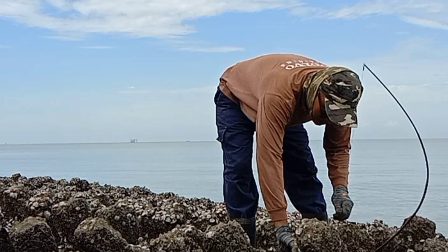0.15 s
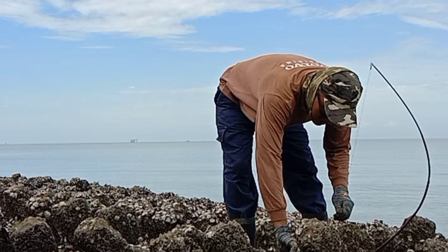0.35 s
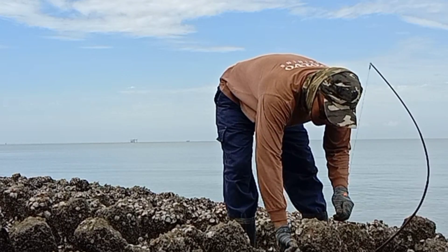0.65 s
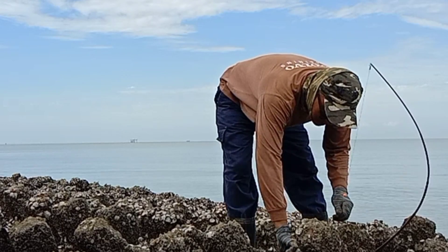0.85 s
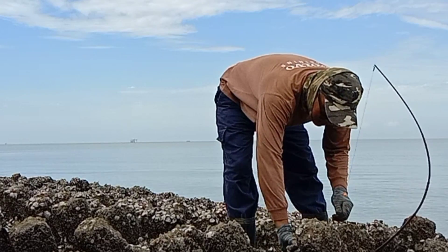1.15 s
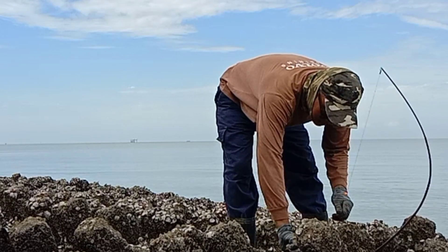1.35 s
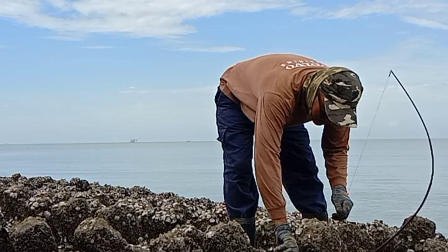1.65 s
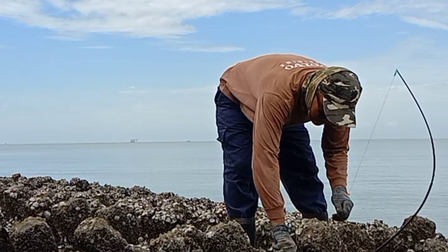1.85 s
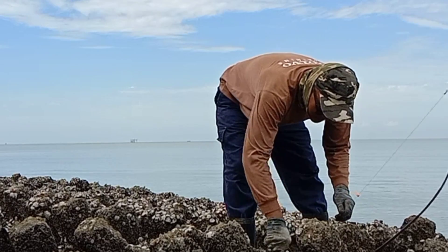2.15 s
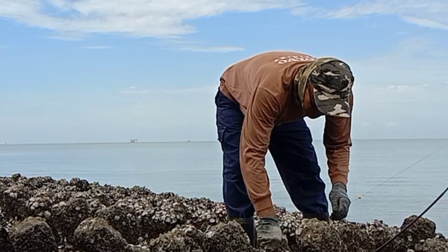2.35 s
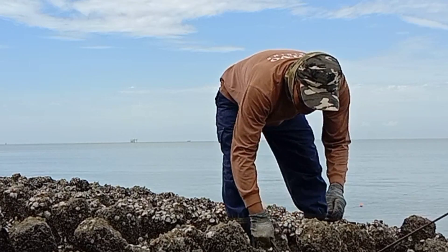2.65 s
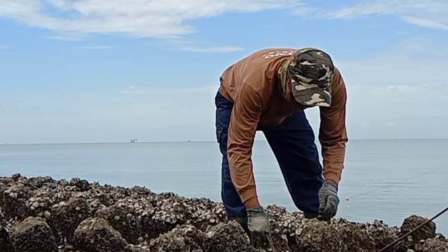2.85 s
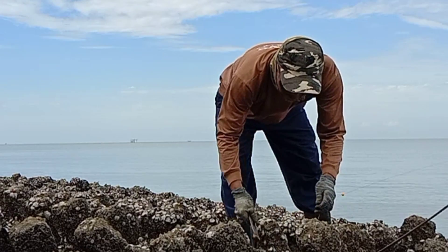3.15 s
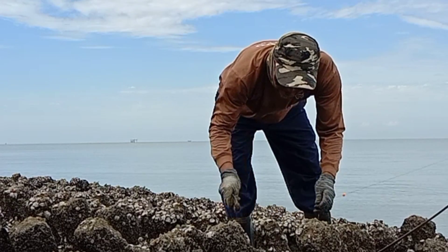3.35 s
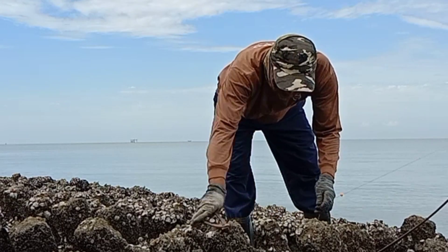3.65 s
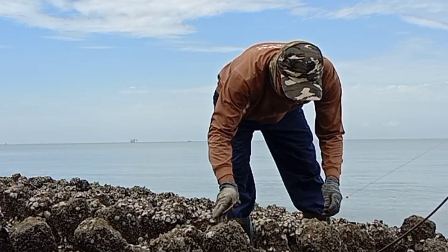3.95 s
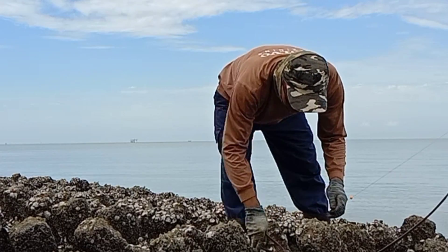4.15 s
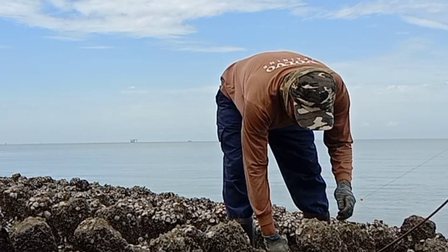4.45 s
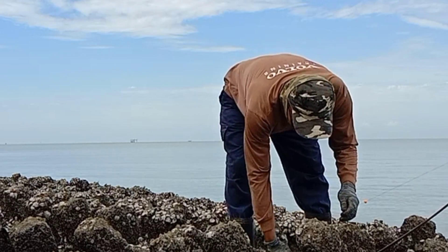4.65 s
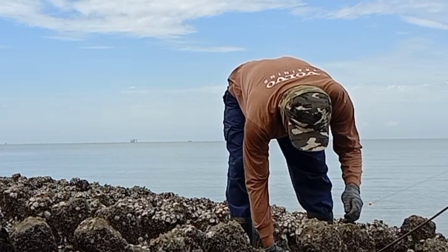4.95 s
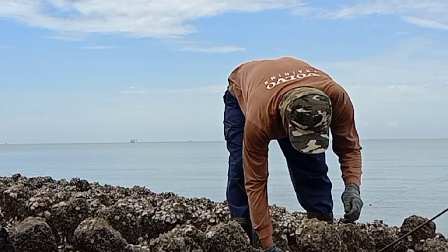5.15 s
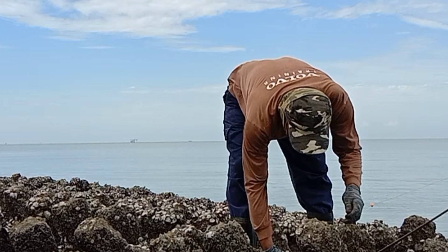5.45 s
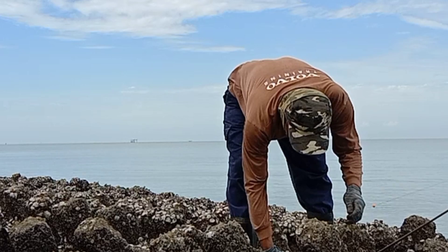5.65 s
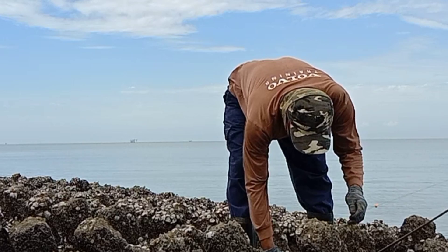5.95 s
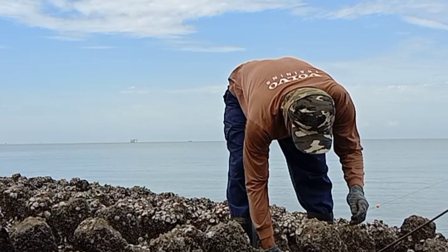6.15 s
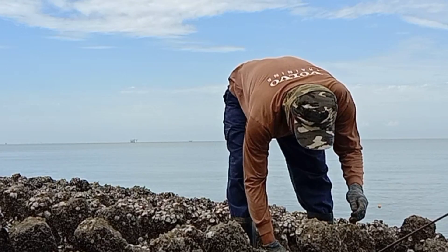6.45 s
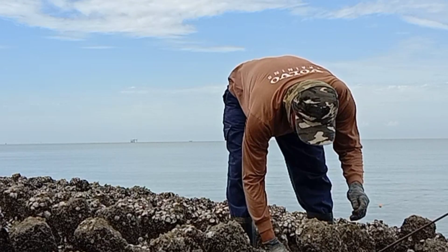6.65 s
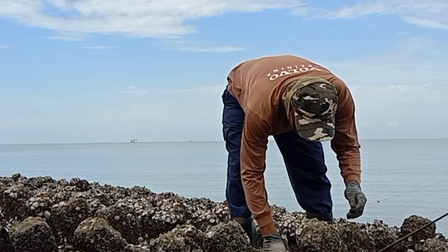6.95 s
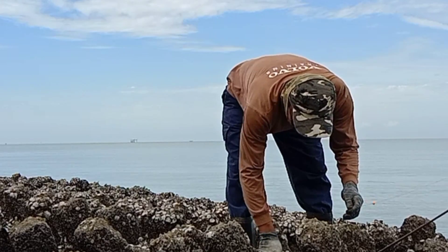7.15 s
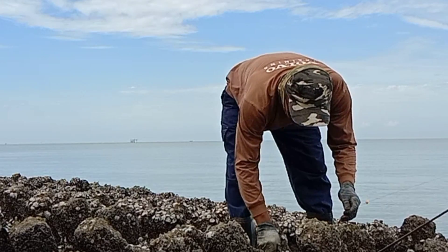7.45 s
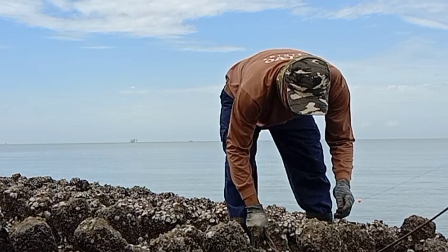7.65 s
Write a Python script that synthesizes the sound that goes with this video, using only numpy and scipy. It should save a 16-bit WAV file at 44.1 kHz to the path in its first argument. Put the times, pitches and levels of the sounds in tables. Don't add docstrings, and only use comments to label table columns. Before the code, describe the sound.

Shell clinks, scrapes and snaps at a quiet rocky shore, with two sharp metallic strikes, soft wind thumps, lapping water and distant bird calls.

```python
import sys
import numpy as np
from scipy import signal
from scipy.fft import rfft, irfft, next_fast_len
from scipy.io import wavfile
from scipy.ndimage import uniform_filter1d, map_coordinates

SR = 44100
rng = np.random.default_rng(int(sys.argv[2]) if len(sys.argv) > 2 else 0)


def volts_from_decibels(level):
    exponent = np.asarray(level, float) / 20
    return 10 ** exponent


def store_pcm(level_fs):
    pcm = np.round(np.clip(level_fs, -1, 1) * 32767).astype(np.int16)
    wavfile.write(sys.argv[1], SR, np.atleast_2d(pcm).T)


N = 344421


def unit(x):
    return x / np.sqrt(np.mean(x ** 2) + 1e-20)


def curves(rows, t):
    s, *columns = np.transpose(rows)
    return [np.interp(t, s, column) for column in columns]


def wobble(rate, size=N):
    knots = rng.standard_normal(int(size * rate / SR) + 4)
    return map_coordinates(knots, [np.arange(size) * rate / SR])


def white_noise(t):
    return rng.standard_normal(len(t))


def coloured(x, spectrum):
    m = next_fast_len(len(x) + 4096)
    f, db = np.transpose(spectrum)
    gain = volts_from_decibels(np.interp(np.log(np.fft.rfftfreq(m, 1 / SR) + 1), np.log(f + 1), db))
    return unit(irfft(rfft(x, m) * gain, m)[:len(x)])


def rush(spectrum, patchy_db):
    z = signal.stft(rng.standard_normal(N + 512), nperseg=512)[2]
    field = uniform_filter1d(rng.standard_normal(z.shape), 5, 0)
    field = uniform_filter1d(field, 9, 1)
    patchy = signal.istft(z * volts_from_decibels(patchy_db * unit(field)), nperseg=512)[1]
    return coloured(patchy[:N], spectrum)


def add(track, s, sound):
    spot = track[round(s * SR):][:len(sound)]
    spot += sound[:len(spot)]


def dying(t, t60, attack):
    return volts_from_decibels(-60 * t / t60) * (1 - np.exp(-t / attack))


def ringing(hz, db, t60, t, attack):
    phase = 2 * np.pi * rng.random((len(hz), 1))
    tones = np.sin(2 * np.pi * hz[:, None] * t + phase)
    return np.sum(volts_from_decibels(db)[:, None] * dying(t, t60[:, None], attack) * tones, axis=0)


def chirps(events, rise):
    out = np.zeros(N)
    for s, db, hz, length in events:
        size = max(length, .008) * SR
        u = np.arange(round(size)) / size
        pitch = hz * (1 + rise * (np.sqrt(u) - .7))
        swell = np.sin(np.pi * u ** 0.69)
        add(out, s - .004, volts_from_decibels(db) * swell * np.sin(2 * np.pi * np.cumsum(pitch) / SR))
    return out


def echoes(x, t60, wet_db, lumpy_db):
    t = np.arange(SR // 3) / SR
    tail = white_noise(t) * dying(t, t60, 1 / 120) * volts_from_decibels(lumpy_db * wobble(150, size=len(t)))
    return x + volts_from_decibels(wet_db) * signal.fftconvolve(x, tail / np.linalg.norm(tail))[:N]


# (frequency [Hz], level [dB])
HUM_TONE = [(90, -27.5), (120, -3), (148, 3.5), (190, -12.5), (300, -22.5), (500, -45.5)]


def far_hum():
    return volts_from_decibels(-72.0 + 2.5 * wobble(7.1)) * rush(HUM_TONE, patchy_db=1.5)


# (time [s], peak level [dB])
WIND_THUMPS = [(0.009, -50), (0.25, -64), (0.41, -54), (0.627, -60), (1.277, -51.5), (1.537, -49.5),
               (1.764, -58.5), (1.925, -53), (2.487, -51), (2.657, -59), (2.798, -52), (3.015, -48),
               (3.178, -53), (3.342, -51.5), (3.425, -47.5), (3.606, -44), (4.741, -53.5), (5.496, -47.5),
               (5.583, -49), (5.951, -50.5), (6.015, -51), (6.317, -48), (6.441, -50.5), (6.995, -50.5),
               (7.086, -51), (7.154, -50.5), (7.378, -56.5), (7.577, -55), (7.679, -53), (7.755, -52)]
# (frequency [Hz], level [dB])
THUMP_TONE = [(12, -60), (20, -24), (27, -29), (47, -20.5), (64, -3), (120, -3.5), (160, -40), (260, -120)]


def wind_thumps():
    puffs = [(s, db, 66 + 4 * rng.standard_normal(), 0.087) for s, db in WIND_THUMPS]
    rumble = volts_from_decibels(-69 + 9.9 * np.tanh(wobble(12))) * rush(THUMP_TONE, patchy_db=1.74)
    return chirps(puffs, rise=0.011) + rumble


# (time of peak [s], peak level [dB], half length [s])
GUSTS = [
    (2.573, -91, 0.045),
    (2.822, -68, 0.015),
    (5.527, -57, 0.029),
    (5.985, -50.5, 0.031),
    (6.069, -58, 0.028),
    (6.446, -50.5, 0.052),
    (6.983, -71, 0.33),
    (7.158, -46, 0.11),
    (7.633, -54.5, 0.16),
]
# (frequency [Hz], level [dB])
BUFFET_TONE = [(76, -35.5), (130, -10.5), (242, 2), (318, -12.5), (450, -37.5), (580, -70), (990, -120)]


def wind_buffets():
    t = np.arange(N) / SR
    breeze = volts_from_decibels(np.interp(t, [5.73, 5.95], [-85, -76.5]))
    gusts = sum(volts_from_decibels(db - 14 * np.abs(t - s) / half) for s, db, half in GUSTS)
    return (breeze + gusts) * rush(BUFFET_TONE, patchy_db=3.5)


# (time [s], level [dB])
WASH = [(0, -74), (2.6, -76.5), (3.3, -70.5), (4.1, -74.5), (4.55, -66.5), (5.2, -67), (5.45, -75.5),
        (6.4, -71), (6.9, -69.5), (7.0, -67.5), (7.3, -67.5), (7.45, -66.5), (7.81, -58)]
# (frequency [Hz], level [dB])
LAPPING_TONE = [(150, -43), (250, -13), (393, -11), (605, -7), (1300, -5.5), (1420, -3.5), (1780, -12.5),
                (3500, -22.5), (4550, -50.5), (7700, -120)]
# (frequency [Hz], level [dB])
HISS_TONE = [(1500, -38.5), (2500, -16.5), (3300, -6), (4100, -19.5), (5300, -3), (6400, -9.5),
             (7350, -11.5), (7600, 2), (8200, -0.5), (9100, -9), (10400, -4), (11000, -17.5), (14900, -14),
             (15700, -21)]


def washing_water():
    wash_db, = curves(WASH, np.arange(N) / SR)
    lapping = volts_from_decibels(wash_db - 4.0) * rush(LAPPING_TONE, patchy_db=4)
    fine_hiss = unit(volts_from_decibels(1.6 * wobble(40)) * rush(HISS_TONE, patchy_db=2.2))
    return lapping + volts_from_decibels(-73.5 + 0.42 * (wash_db + 71)) * fine_hiss


def debris():
    place, pitch, size, life = rng.random((4, 1200))
    s = place * N / SR
    busy_db, = curves(WASH, s)
    db = -84 + .7 * (busy_db + 70) - 3 * np.log(size + .02)
    crumbs = chirps(np.transpose([s, db, 600 * 17 ** pitch, .008 + .014 * life]), rise=.05)
    return echoes(crumbs, t60=.1, wet_db=1.5, lumpy_db=3)


# (time [s], peak level [dB], pitch [Hz])
PLOPS = [(0.527, -64, 1366), (0.765, -61, 733), (0.871, -66.5, 1015), (1.238, -70.5, 1204),
         (2.12, -67.5, 1687), (2.409, -59, 1363), (2.564, -56.5, 474), (2.785, -48.5, 1250),
         (3.294, -63.5, 720), (3.33, -60.5, 702), (4.056, -67, 1416), (4.27, -67.5, 575),
         (4.377, -65.5, 694), (4.509, -48, 1118), (4.547, -56, 1120), (4.793, -59, 1486),
         (4.855, -50, 1440), (4.989, -61, 1103), (5.156, -58, 1198), (5.223, -58.5, 1165),
         (5.605, -64, 520), (5.78, -68.5, 535), (6.799, -66, 1674), (6.969, -52.5, 1310)]


def water_plops():
    plops = [(s, db, hz, 0.0068 * 0.15 * max(-45.5 - db, 0)) for s, db, hz in PLOPS]
    return echoes(chirps(plops, rise=.08), t60=.2, wet_db=-1.5, lumpy_db=3)


# (time [s], peak level [dB], pitch [Hz])
COO_NOTES = [(3.057, -41, 1244), (3.1923, -44.5, 1275), (3.261, -47.5, 1204), (3.3422, -50, 1252),
             (3.429, -47, 1256), (3.5491, -38.5, 1282), (5.965, -40, 1274), (6.1635, -44.5, 1230),
             (6.2348, -43.5, 1234), (6.318, -43, 1262), (6.429, -43, 1278)]
CALL_STARTS = [3.053, 5.962]
# (time [s], peak level [dB], pitch [Hz])
COO_THROBS = [(0.091, -63, 1264), (0.287, -64, 1257), (0.314, -62, 1244), (3.102, -42, 1317),
              (3.131, -52, 1444), (3.1409, -41.5, 1282), (3.164, -54, 1002), (3.177, -49.5, 1177),
              (3.579, -54, 1245), (3.6347, -64, 1163), (6, -42, 1353), (6.0371, -41.5, 1321),
              (6.0779, -41, 1240), (6.1, -45, 1305), (6.4539, -51, 1288), (6.501, -67, 1220),
              (6.636, -58.5, 1189)]


def dove():
    low = []
    for s, db, hz in COO_NOTES:
        since_start = min(s - start for start in CALL_STARTS if s > start - .01)
        low_db = -44 - 14 * (1 - np.exp(-since_start / 0.22))
        low.append((s - .011, low_db, 998, 0.024))
    notes = chirps([(*note, 0.03) for note in COO_NOTES], rise=0.18)
    throbs = chirps([(*throb, .03) for throb in COO_THROBS], rise=0.0068)
    return echoes(notes + throbs + chirps(low, rise=0.05), t60=0.3, wet_db=-6, lumpy_db=6)


def whistle(length, first_hz, last_hz, db, trill_hz, clean_s, flare_db, step_hz, swell_share):
    t = np.arange(0, length, 1 / SR)
    u = t / length
    clean = np.clip((t - length + clean_s) / 0.031, 0, 1)
    depth = .6 + (.1 - .6) * clean
    trill_rate = np.interp(u, [0, 1], trill_hz) * np.exp(.25 * wobble(30, size=len(t)))
    turn = 2 * np.pi * np.cumsum(trill_rate) / SR
    pulses = (1 + depth * np.cos(turn)) / np.sqrt(1 + depth ** 2 / 2)
    pitch = first_hz + (last_hz - first_hz) * u ** .65 - step_hz * clean + 85 * depth * np.sin(turn)
    tone = np.sin(2 * np.pi * np.cumsum(pitch) / SR)
    level_db = db - 22 * np.exp(-3 * u / swell_share) + flare_db * clean + 2.4 * wobble(40, size=len(t))
    edges = np.clip(np.minimum(t, length - t) / 0.017, 0, 1)
    return np.sqrt(2) * volts_from_decibels(level_db) * pulses * edges * tone


# (start [s], length [s], first pitch [Hz], last pitch [Hz], level [dB])
FALLING_WHISTLES = [
    (3.04, .33, 2850, 2530, -80),
    (3.4, .43, 5790, 4990, -61),
    (4.58, .515, 5260, 4660, -62.5),
    (5.92, .545, 5380, 5060, -55),
]
# (end [s], pitch [Hz], level [dB], clear ending [s], ending above the trill [dB])
LEVEL_WHISTLES = [
    (4.39, 4560, -65, .08, -5),
    (5.755, 4200, -71, .17, 7),
    (7.31, 3730, -68, .07, 6),
    (7.97, 3420, -65, .07, 0),
]


def bird_of_prey():
    out = np.zeros(N)
    for s, *call in FALLING_WHISTLES:
        add(out, s, whistle(*call, trill_hz=(95, 60), clean_s=.115, flare_db=7, step_hz=80, swell_share=.6))
    length = .4
    for end, hz, db, clean_s, flare_db in LEVEL_WHISTLES:
        call = whistle(length, hz, hz * (1 - .008), db, (50, 40), clean_s, flare_db, step_hz=30, swell_share=.3)
        add(out, end - length, call)
    return echoes(out, t60=.16, wet_db=-3, lumpy_db=4)


# (start [s], length [s], level [dB])
RUMMAGING = [
    (2.64, .1, -73.5),
    (2.883, .42, -78),
    (4.152, .4, -86),
    (4.697, 0.79, -81),
    (6.933, 0.13, -66),
    (7.166, 0.11, -67),
    (7.328, 0.29, -72),
]


def rummage():
    out, t = np.zeros(N), np.arange(SR // 40) / SR
    for s, length, level_db in RUMMAGING:
        when, size = rng.random((2, 400))
        draw = rng.standard_normal((400, 7))
        clump_db = 3 * wobble(13.1, size=SR)
        for k, (pitch, life, *partials) in enumerate(draw[:round(length * 410)]):
            hz = np.clip(6580 * 2 ** (0.54 * pitch + 0.4 * np.array(partials)), 900, 15000)
            after = when[k] * length
            db = level_db - 2 * np.log(size[k] + 0.02) + clump_db[round(after * SR)]
            t60 = 0.017 * np.exp(.4 * life)
            add(out, s + after, ringing(hz, np.full(len(hz), db), np.full(len(hz), t60), t, .002))
    return out


# (time [s], peak level [dB], brightest pitch [Hz], knock [dB])
CLINKS = [(1.877, -38.5, 8400, -16), (1.9827, -36, 5860, -22), (2.2012, -42, 5470, -28),
          (2.5578, -51.5, 3210, -8), (2.9712, -34.5, 5920, -23), (3.881, -51.5, 965, -12),
          (4.4663, -48, 5230, -12), (5.3795, -49, 6400, -14.5), (6.4593, -47.5, 5280, -2),
          (6.7376, -54, 5040, -3.5), (7.336, -47.5, 8860, -40), (7.4384, -46, 3080, -30),
          (7.4555, -48, 4970, -20), (7.564, -34.5, 8900, -30), (7.576, -31, 6290, -13)]
# (time [s], peak level [dB], brightest pitch [Hz], knock [dB])
SCRAPES = [(2.7108, -35.5, 7380, -41), (7.1664, -28.5, 6480, -25), (7.2459, -48, 3600, -16),
           (7.3536, -44, 5690, -28), (7.39, -46, 7900, -29), (7.501, -40, 6300, -18),
           (7.5986, -41.5, 5170, 6.5), (7.675, -45, 8450, 1), (7.7061, -55, 3470, 4)]
# (time [s], peak level [dB], brightest pitch [Hz], time to fall 60 dB [s], knock [dB])
HOLLOW_SHELLS = [
    (1.93, -40, 3300, 0.5, -25),
    (2.8135, -35, 3070, 0.08, -8),
]
# (time [s], peak level [dB], brightest pitch [Hz])
TICKS = [(0.8674, -49, 2430), (1.5195, -52.5, 7530), (1.7898, -50, 10100), (2.133, -49, 8560),
         (2.2352, -46.5, 13900), (2.641, -53, 5730), (2.668, -44.5, 7150), (2.9546, -55, 5200),
         (3.26, -48, 5600), (3.4775, -43, 7330), (4.43, -53.5, 6000), (5.2948, -47.5, 8500),
         (5.4363, -47.5, 10600), (5.7548, -42.5, 8740), (6.2432, -44.5, 5820), (6.7903, -44.5, 7000),
         (6.8303, -45, 6670), (7.19, -46, 6150), (7.2183, -44.5, 8700), (7.5294, -58, 6300),
         (7.7648, -67, 7900),
         (0.3157, -51, 7760), (0.4389, -56, 5200), (0.6644, -51.5, 8060), (0.7746, -54, 7930),
             (1.0294, -61, 8100), (1.053, -52, 7960), (1.2094, -54, 7880), (1.4057, -54, 8000),
             (1.5044, -51, 8080), (1.539, -56, 5100), (1.653, -51, 8000), (1.7194, -60, 7980)]
# (frequency [Hz], level [dB])
ROCK_TONE = [(120, -49.5), (200, -29), (409, -15.5), (1100, -11), (2910, -17.5), (3490, -6), (3970, -17),
             (5840, -2.5), (6880, -11.5), (7970, -4.5), (10100, -15.5), (14900, -14.5), (16000, -22.5)]


def touches():
    drag = lambda db: 2.0 + 0.079 * max(-37.5 - db, 0)
    return ([(*row, -22, 0.047 * drag(row[1])) for row in CLINKS]
            + [(*row, -1.5, 0.031 * drag(row[1])) for row in SCRAPES]
            + [(s, db, hz, knock_db, -30, t60) for s, db, hz, t60, knock_db in HOLLOW_SHELLS]
            + [(*row, -30, -12, 0.072) for row in TICKS])


def light_touches():
    out, t = np.zeros(N + SR), np.arange(SR // 5) / SR
    clumps = volts_from_decibels(3 * wobble(170))
    fizz_tone = [(9000, -81), (11500, 0.5), (12300, 9.0), (13000, -4), (15500, -16.5)]
    knock_tone = [(190, -33), (320, 4.5), (620, -24.5), (1250, 2.5), (2200, -10.0), (3500, -29.5)]
    for s, db, hz, knock_db, fizz_db, t60 in touches():
        slope_db = np.interp(db, [-44, -20], [34, 13])
        band = [(hz / 4, -2 * slope_db), (hz / 0.98, 0), (hz * 0.81, 0), (hz * 4, -2 * slope_db)]
        grit = coloured(coloured(white_noise(t), ROCK_TONE), band)
        fizz = volts_from_decibels(fizz_db) * coloured(white_noise(t), fizz_tone)
        knock = volts_from_decibels(knock_db) * coloured(white_noise(t), knock_tone)
        draw = rng.standard_normal((3, 5))
        shell_t60 = .35 * t60 * np.exp(.2 * draw[2])
        shell = ringing(hz * np.exp(.1 * draw[0]), 3 * draw[1], shell_t60, t, .0008)
        hit = dying(t, 0.24 * t60, 0.0032)
        trail = 0.099 * dying(t, 1.6 * t60, 0.0038) * np.roll(clumps, -round(s * SR))[:len(t)]
        add(out, s - .0006, volts_from_decibels(db - 5) * ((grit + fizz + knock) * (hit + trail) + 0.27 * shell))
    return out[:N]


# (start [s], peak time [s], end [s], level [dB], dull part [dB])
GRINDS = [(1.903, 1.918, 1.921, -52, -6), (2.777, 2.784, 2.825, -68, 6), (2.785, 2.812, 2.815, -60, -8),
          (2.8115, 2.816, 2.845, -42, -8), (2.822, 2.828, 2.85, -47, -10), (2.836, 2.842, 2.865, -46, -15),
          (2.848, 2.854, 2.875, -45, -18), (2.86, 2.868, 2.905, -48, -20), (3.87, 3.892, 3.895, -45, -8),
          (6.9, 6.923, 6.926, -55, -8), (7.16, 7.172, 7.23, -50, -10), (7.385, 7.4, 7.43, -57, -10),
          (7.43, 7.46, 7.51, -54, -4), (7.497, 7.51, 7.56, -52, -10), (7.572, 7.585, 7.66, -52, -4),
          (7.67, 7.685, 7.76, -56, -6)]
# (frequency [Hz], level [dB])
CRUNCH_TONE = [(1500, -38), (2600, -9.5), (3300, -11), (4100, -14.5), (5500, -1), (8300, -6.5),
               (10000, -16), (12500, -10), (15600, -7.5), (16500, -30)]
# (frequency [Hz], level [dB])
DULL_TONE = [(200, -27), (330, -3.5), (560, -3.5), (800, -14.5), (1290, 1.5), (2500, -9.5), (4000, -41)]


def grinds():
    out, t = np.zeros(N), np.arange(N) / SR
    bright = unit(volts_from_decibels(3 * wobble(700)) * rush(CRUNCH_TONE, patchy_db=4))
    dull = rush(DULL_TONE, patchy_db=3)
    for start, peak, end, db, dull_db in GRINDS:
        shape_db = np.interp(t, [start - .02, start, peak, end, end + .02], [-80, -17, 0, -17, -80])
        out += volts_from_decibels(db + shape_db) * (bright + volts_from_decibels(dull_db) * dull)
    return out


# (time [s], peak level [dB], brightest pitch [Hz])
SNAPS = [(2.8148, -18.5, 7630), (2.8203, -28, 7400), (2.8247, -24, 14500), (2.8285, -36.5, 6360),
         (2.8368, -50, 5590), (3.7478, -7, 7850), (3.758, -14.5, 5590), (3.7872, -28, 5600),
         (3.7956, -25.5, 5700), (3.8071, -26.5, 8080), (3.8259, -29.5, 5500), (3.8943, -1.5, 7400),
         (3.9008, -16.5, 7896), (3.9091, -19, 5330), (3.9188, -26, 5590), (3.9257, -27.5, 5680),
         (3.9377, -28, 5760), (6.9181, -49, 6970), (6.9579, -40.5, 5970), (7.3938, -44.5, 9600),
         (7.4562, -44, 4950), (7.5775, -45, 6300)]


def snaps():
    out, t = np.zeros(N), np.arange(SR // 50) / SR
    for s, db, hz in SNAPS:
        crack = dying(t, 0.0017, .0001) * coloured(white_noise(t), CRUNCH_TONE)
        ring = volts_from_decibels(1.5) * dying(t, 0.0047, 0.00025) * np.sin(2 * np.pi * hz * t)
        add(out, s - .0002, volts_from_decibels(db) * (crack / np.abs(crack).max() + ring) / 1.5)
    return out


# (pitch [Hz], level [dB], time to fall 60 dB [s])
WIDE_SHELL = [(1351, -4, .045), (1650, -9, .02), (2300, -12, .02), (3140, -2, .025), (3375, -9, .06),
              (3650, -5, .02), (5340, 0, .035), (5475, -5, .05), (5895, -2, .035), (6056, -8, .06),
              (6379, -4, .03), (7200, -9, .02), (7900, -12, .025), (9351, -10, .025)]
# (pitch [Hz], level [dB], time to fall 60 dB [s])
THIN_SHELL = [(1230, -3.5, 0.025), (1890, -18.5, .03), (3157, 0, 0.016), (3600, -9, 0.044),
              (5330, 3, 0.017), (5420, -6, 0.019), (5700, -18, 0.22), (5835, -2, 0.035), (7030, -1, 0.018),
              (8480, -8, 0.023)]
# (time [s], peak level [dB])
WIDE_TAPS = [
    (1.9188, -22.5),
    (1.9234, -27),
    (1.9272, -32),
]
# (time [s], peak level [dB])
THIN_TAPS = [
    (6.9239, -19),
    (6.9272, -24),
]
# (frequency [Hz], level [dB])
SHELL_CRACK_TONE = [(200, -33), (409, -14), (1200, -9), (2300, -14), (3300, -8), (4100, -16), (5800, -3),
                    (7200, -8), (8600, -8), (9800, -22), (15000, -24), (16000, -32)]


def shell_taps():
    out, t = np.zeros(N), np.arange(SR // 5) / SR
    for shell, hits in [(WIDE_SHELL, WIDE_TAPS), (THIN_SHELL, THIN_TAPS)]:
        for s, db in hits:
            crack = volts_from_decibels(5) * dying(t, .02, 0.00039) * coloured(white_noise(t), SHELL_CRACK_TONE)
            add(out, s, volts_from_decibels(db - 11.5) * (ringing(*np.transpose(shell), t, 0.00013) + crack))
    return echoes(out, t60=.16, wet_db=-15, lumpy_db=4)


# (time [s], peak level [dB], crack [dB], crack fall time [s], scatter fall time [s])
BLOWS = [
    (3.7464, -3.5, 2, .03, .13),
    (3.7742, -14, 2, .03, .2),
    (3.8929, -5, 3, .015, .15),
    (3.8936, -25, 19, .008, .1),
]
# (pitch [Hz], level [dB], time to fall 60 dB [s])
FIRST_GRIP = [(398, -7, .07), (520, -15, .08), (641, -18, .07), (1007, -14, .05), (1150, -8, .025),
              (1300, -6, .028), (1750, -12, .05), (3451, -11, .08), (5060, -4, .05), (5435, -14, .1),
              (5800, -1, .08), (5720, -13, .2), (7795, -10, .04), (8215, -8, .1), (8660, -5, .045),
              (8865, -5, .065), (10610, -11, .06), (12135, -9, .08), (12600, -10, .055), (14470, -8, .05),
              (15020, -19, .08)]
# (pitch [Hz], level [dB], time to fall 60 dB [s])
SECOND_GRIP = [(398, -3, .07), (520, -11, .08), (640, -15, .08), (1003, -10, .045), (1145, -4, .025),
               (1290, -2, .025), (1760, -20, .08), (3453, -6, .075), (5070, -4, .075), (5177, -10, .07),
               (5790, -12, .13), (6180, -15, .09), (6335, -15, .12), (7730, -3, .03), (7910, -10, .07),
               (8135, -11, .09), (9540, -12, .1), (11850, -9, .04), (12600, -15, .08), (15285, -10, .07)]
# (frequency [Hz], level [dB])
GRIT_TONE = [(200, -40.5), (409, -16), (1100, -21), (2910, -22), (3490, -11.5), (3970, -19.5), (5840, -5),
             (6880, -11.5), (7970, -3), (10100, -16.5), (14900, -14), (16000, -24.5)]


def hard_blows():
    out, t = np.zeros(N), np.arange(SR // 4) / SR
    grips = [FIRST_GRIP, FIRST_GRIP, SECOND_GRIP, SECOND_GRIP]
    flutter_db = 3 * np.minimum(t / .01, 1)
    for (s, db, crack_db, crack_t60, scatter_t60), grip in zip(BLOWS, grips):
        crack = volts_from_decibels(crack_db) * dying(t, crack_t60, .0004) * coloured(white_noise(t), ROCK_TONE)
        uneven = volts_from_decibels(-9.5 + 3 * wobble(100, size=len(t)))
        scatter = uneven * dying(t, scatter_t60, 0.0038) * coloured(white_noise(t), GRIT_TONE)
        bar = np.zeros(len(t))
        for mode in grip:
            tone = ringing(*np.transpose([mode]), t, 0.0014)
            bar += volts_from_decibels(flutter_db * wobble(70, size=len(t))) * tone
        add(out, s, volts_from_decibels(db - 9.5) * (bar + crack + scatter))
    return echoes(out, t60=.14, wet_db=-18, lumpy_db=4)


def scene():
    wind = wind_thumps() + wind_buffets()
    water = far_hum() + washing_water() + debris() + water_plops()
    birds = dove() + bird_of_prey()
    hand = rummage() + light_touches() + grinds() + snaps() + shell_taps() + hard_blows()
    return (wind + water + birds + hand)[None]


def band_limit(x):
    return signal.sosfilt(signal.butter(12, 16800, fs=SR, output="sos"), x)


def record(dry):
    top = np.fft.rfftfreq(N, 1 / SR) > 15750
    mix = irfft(rfft(dry) * volts_from_decibels(-20 * top), N)
    return band_limit(mix)


dry = scene()
out = record(dry)
store_pcm(out)
```